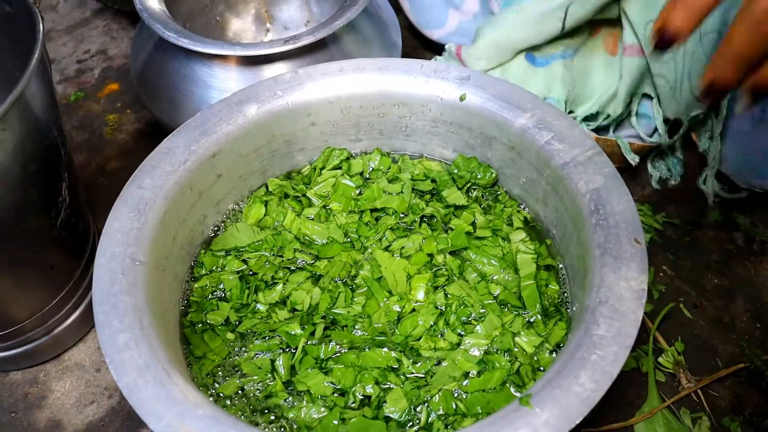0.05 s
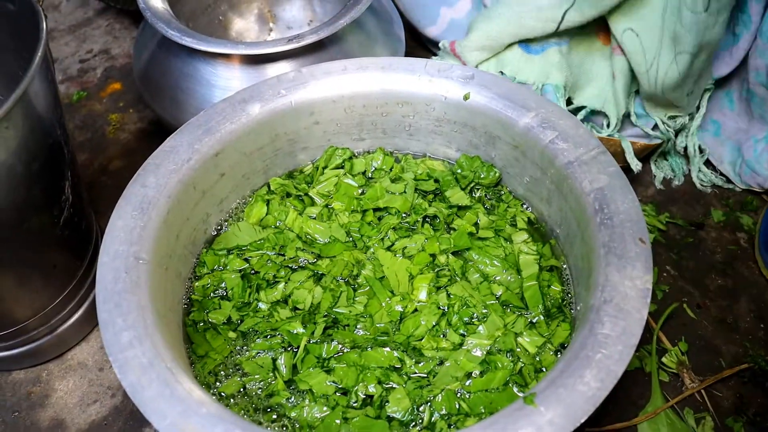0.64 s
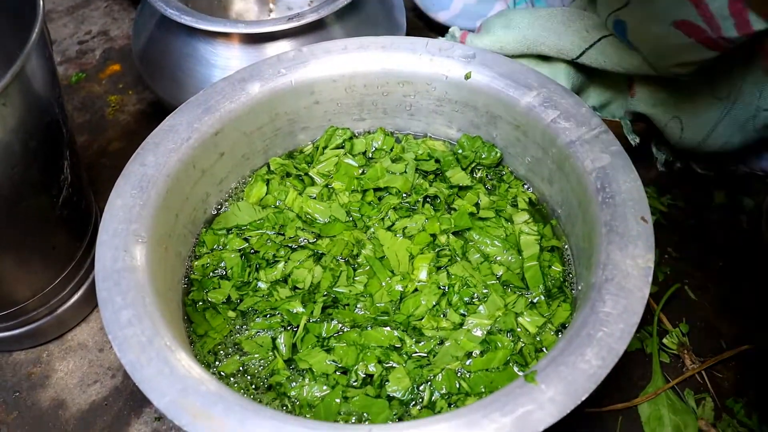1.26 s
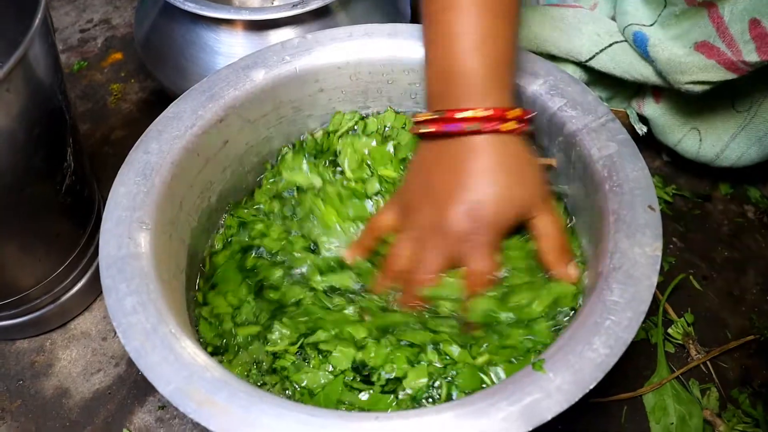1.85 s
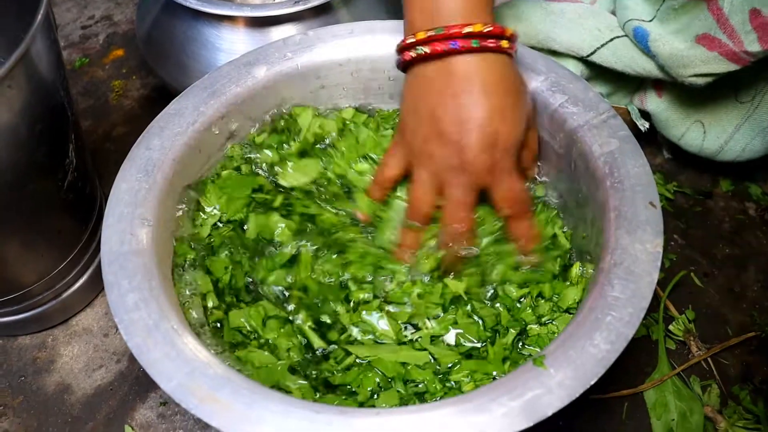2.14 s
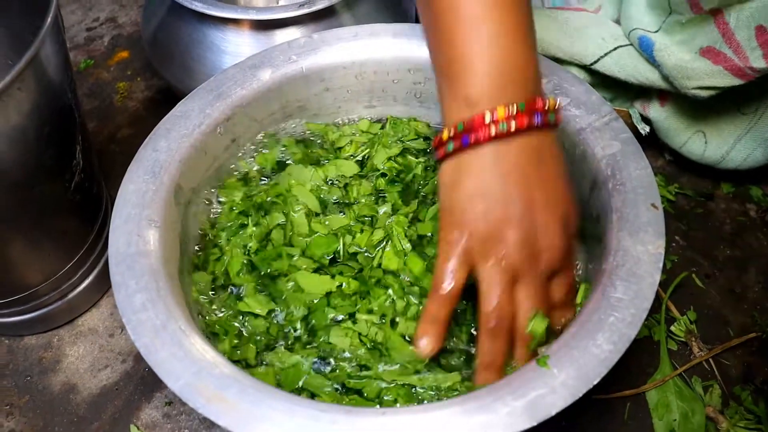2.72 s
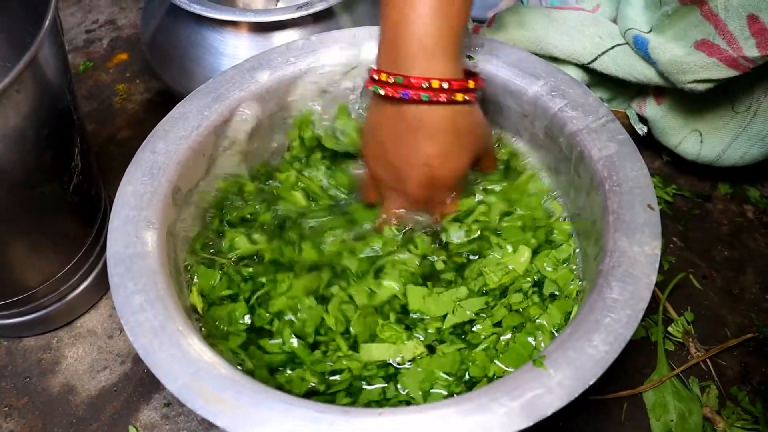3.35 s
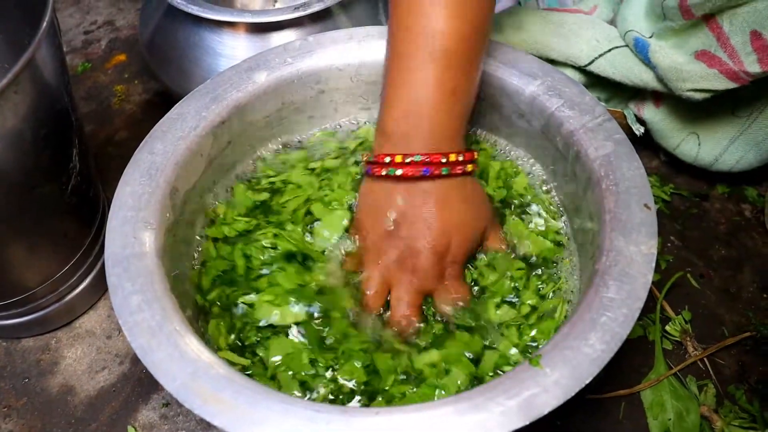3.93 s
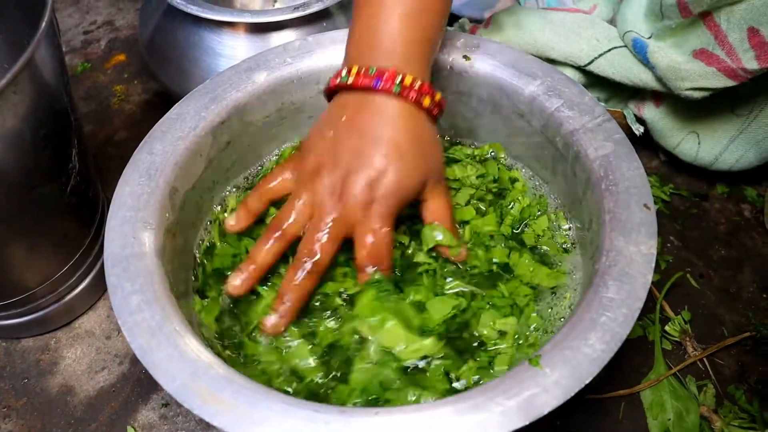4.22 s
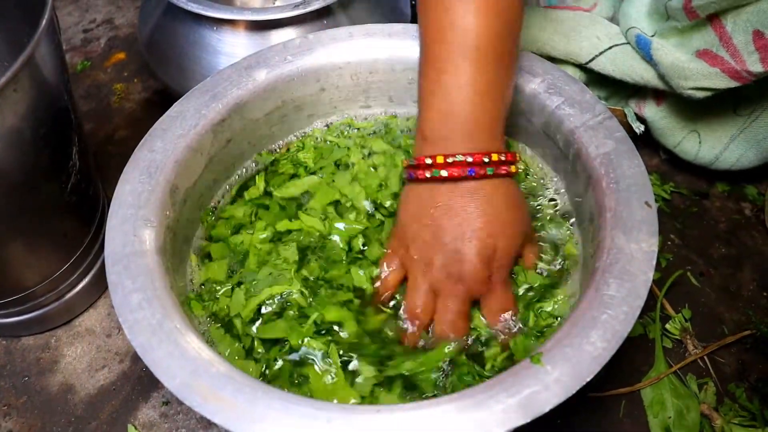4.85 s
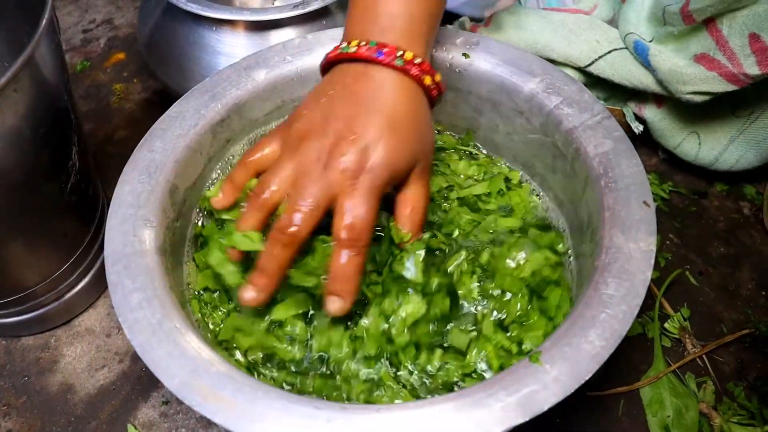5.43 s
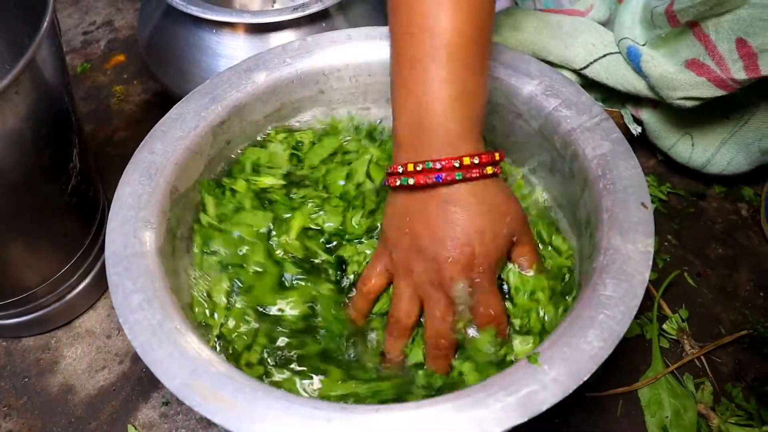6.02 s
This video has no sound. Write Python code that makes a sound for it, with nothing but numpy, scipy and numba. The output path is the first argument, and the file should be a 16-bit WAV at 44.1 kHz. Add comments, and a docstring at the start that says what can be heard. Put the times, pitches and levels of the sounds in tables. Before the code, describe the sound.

Bangles clink and cloth rustles, then water sloshes, splashes and bubbles as leaves are washed by hand in a basin.

```python
"""Chopped spinach washed by hand in a wide aluminium basin, outdoors in a yard, stereo microphone close by.
Over quiet air and a faint, far whistle, cloth rustles and bangles clink as the arm reaches over.
At about 1.7 s the hand dives in, then stirs about twice a second. Each stroke throws splashes,
folds air into ringing bubbles and crackles through the wet leaves; now and then the basin rings faintly."""
import sys
import numpy as np
from scipy import signal
from scipy.fft import rfft, irfft
from scipy.io import wavfile
from scipy.ndimage import uniform_filter1d
from numba import njit

SR = 44100
rng = np.random.default_rng(int(sys.argv[2]) if len(sys.argv) > 2 else 0)


def output_pcm(signal):
    """Save a mono or channel-first signal as 16-bit PCM at the path in sys.argv[1].

    Samples are clipped to [-1, 1] before scaling.
    """
    pcm = np.clip(np.atleast_2d(signal).T, -1, 1) * 32767
    wavfile.write(sys.argv[1], SR, np.round(pcm).astype(np.int16))


N = 272538
TIME = np.arange(N) / SR
FREQS = np.fft.rfftfreq(N, 1 / SR) + 1
HAND_IN_S, WETTING_S = 1.66, 0.018

# spectrum of spray landing on the leaves: (frequency [Hz], level [dB])
SPRAY_SPECTRUM = [(2500, -13.5), (4000, -6.5), (5200, 4.5), (7000, 5.5), (9000, 0), (11000, 2.5),
                  (13000, -1.5), (16000, -4)]
# spectrum of water slapping hand and leaves: (frequency [Hz], level [dB])
SLAP_SPECTRUM = [(250, -54), (450, -39), (650, -16), (1050, 12.5), (1350, -6), (2100, 8.5), (2500, 5.5),
                 (3200, 12), (4500, -4), (7000, -9)]


def from_db(db):
    """Decibels to gain."""
    return np.exp(np.asarray(db) * (np.log(10) / 20))


def rms_one(x):
    """Scale to rms 1."""
    return x / np.sqrt(np.mean(x ** 2) + 1e-20)


def at_hz(points, hz):
    """Read a spectrum on a log-frequency axis."""
    f, value = np.transpose(points)
    return np.interp(np.log(hz), np.log(f), value)


def filtered(x, kind, hz, order):
    """Butterworth filter."""
    return signal.sosfilt(signal.butter(order, hz, kind, fs=SR, output="sos"), x)


def add(out, s, sound):
    """Mix a sound in at time s."""
    i = max(int(s * SR), 0)
    part = sound[..., :max(N - i, 0)]
    out[..., i:i + part.shape[-1]] += part


def swell(start_s, hold_s, rise_db_per_s, fall_db_per_s):
    """Gain that rises to 1 at start_s, holds and falls away."""
    early, late = np.maximum(start_s - TIME, 0), np.maximum(TIME - start_s - hold_s, 0)
    return from_db(-np.minimum(rise_db_per_s * early + fall_db_per_s * late, 120))


def evened(x, span_s):
    """Hold the rms near 1 over a span, keeping the finer grain."""
    power = uniform_filter1d(np.mean(x ** 2, axis=0), max(int(span_s * SR), 8))
    return x / np.sqrt(np.abs(power) + .05 * power.mean())


def noise(spectrum, grain=1):
    """Coloured stereo noise of rms 1, centred in the bass and wide in the treble; grain makes it crackle."""
    # likeness of left and right at the microphone: (frequency [Hz], correlation [0..1])
    likeness = [(60, 0.98), (130, 1), (300, 0.88), (640, 0.81), (1400, 0.76), (3100, 0.54), (7000, 0.17),
                (15000, 0)]
    alike = np.clip(at_hz(likeness, FREQS), -1, 1)
    mid, side = rfft(rng.standard_normal((2, N)) * grain)
    pair = np.sqrt(1 + alike) * mid + np.sqrt(1 - alike) * side * [[1], [-1]]
    return rms_one(irfft(pair * from_db(at_hz(spectrum, FREQS)), N))


def impacts(per_s, spread_db):
    """Envelope of tiny impacts of unequal size, each dying in about a millisecond."""
    sizes = from_db(spread_db * np.minimum(rng.exponential(1, N), 4))
    hits = sizes * (rng.random(N) < per_s / SR)
    return signal.lfilter([1], [1, -np.exp(-1 / (0.00095 * SR))], hits + 1e-9)


def struck(modes, spread_db, detune):
    """Stereo ring of an object after one blow; strength and pitch of each mode vary with the contact."""
    hz, db, t60 = np.transpose(modes)[:, :, None]
    t = TIME[:SR // 5]
    strength = db + spread_db * rng.standard_normal(hz.shape)
    pitch = hz * (1 + detune * rng.standard_normal(hz.shape))
    phase = rng.standard_normal((2, len(hz), 1)) * np.minimum(hz / 4000, 2)
    return np.sum(from_db(strength - 60 * t / t60) * np.sin(2 * np.pi * pitch * t + phase), axis=1)


def yard_air():
    """The quiet outdoor air all around, mostly low rumble."""
    # spectrum of the air: (frequency [Hz], level [dB])
    air_spectrum = [(18, -14), (37, 6), (55, 3), (90, -3), (135, 6), (190, -2.5), (300, -3), (600, -7),
                    (1000, -13.5), (1800, -16), (3000, -29), (7000, -32), (16000, -18.5)]
    return from_db(-49.5) * noise(air_spectrum)


def reflections(x, t60, dull_hz):
    """Dense, quick echoes from the basin wall and the things standing around it."""
    t = TIME[:SR // 4]
    mid, side = rng.standard_normal((2, len(t))) * from_db(-60 * t / t60) * (t > .0012)
    side = filtered(side, "high", 1500, order=1)
    response = filtered(mid + side * [[1], [-1]], "low", dull_hz, order=1)
    return signal.fftconvolve(x, response / np.sqrt(2 * np.sum(mid ** 2)), axes=1)[:, :N]


def whistle():
    """Far off, a faint, airy tone flutters, climbs slowly and fades."""
    # course of the whistle: (time [s], pitch [Hz], level [dB])
    course = [(0, 1277, -62), (.23, 1357, -54), (.5, 1445, -63), (.59, 1470, -48), (.68, 1450, -75),
              (.8, 1440, -90)]
    s, hz, db = np.transpose(course)
    flutter = filtered(rng.standard_normal((2, N)), "low", 35, order=2)
    phase = 2 * np.pi * np.cumsum(np.interp(TIME, s, hz)) / SR
    tone = rms_one(flutter[0] * np.sin(phase) + flutter[1] * np.cos(phase))
    return from_db(np.interp(TIME, s, db)) * tone


def cloth():
    """A little to the right, fibres rub as sleeve and shawl sweep forward, until the hand is in."""
    # sweeps of the cloth: (time of peak [s], level [dB], rise [dB/s], fall [dB/s])
    sweeps = [(.23, -40, 94, 99), (1.1, -51.5, 13.5, 8)]
    # spectrum of rubbing fibres: (frequency [Hz], level [dB])
    rustle_spectrum = [(600, 1), (1400, 2), (2500, 4), (4000, 2), (7000, -2), (11000, -5), (16000, -12.5)]
    motion = sum(from_db(db) * swell(s, 0, rise, fall) for s, db, rise, fall in sweeps)
    reaching = np.clip((HAND_IN_S - TIME) / WETTING_S, 0, 1)
    fibres = impacts(per_s=9000, spread_db=2)
    return motion * reaching * noise(rustle_spectrum, fibres) * from_db([[-1.2], [1.2]])


def bangles():
    """Close on the right, two bangles meet with a crack and a slight knock, then shimmer out of tune."""
    # contacts: (time [s], level [dB], lowest strongly struck frequency [Hz])
    clinks = [(0.2202, -21, 1930), (0.445, -34, 2900), (0.569, -25, 1610), (0.582, -17.5, 4260),
              (0.7425, -24.5, 2920), (1.13, -32.5, 3600), (1.2178, -28, 4530), (1.302, -12.5, 7500),
              (1.318, -20, 6550), (1.3263, -12.5, 6900), (1.4924, -8, 3300), (1.545, -31, 2800)]
    # modes of a bangle: (frequency [Hz], level [dB], t60 [s])
    bangle_modes = [(3270, -2, 0.18), (3920, -7, 0.16), (4350, 2, 0.17), (5900, -13, 0.15),
                    (6540, -1, 0.16), (7050, 6, 0.079), (8000, -12, 0.2), (9930, -4, 0.18),
                    (13800, -13, 0.17), (14200, -6, 0.18)]
    out, t = np.zeros((2, N)), TIME[:SR // 5]
    fade = from_db(-60 * t / .016) + from_db(-25 - 60 * t / .16)
    for s, db, low_hz in clinks:
        crack = rng.standard_normal((2, len(t))) * fade
        ring = sum(struck(bangle_modes, spread_db=2.5, detune=.008) for _ in range(2))
        high_hz = min(2.8 * low_hz + 2500, 17000)
        clink = filtered(crack + from_db(-32.5) * ring, "band", [low_hz, high_hz], order=1)
        clink = filtered(clink, "high", 0.55 * low_hz, order=2)
        knock = filtered(crack[0], "low", 1500, order=1)
        add(out, s, from_db(db + 4) * (clink + from_db(-22) * knock))
    return out * from_db([[-1.8], [1.8]])


def basin_knocks():
    """Hand and water hit the basin wall; the water damps its ring."""
    # blows on the wall: (time [s], level [dB])
    blows = [(1.8892, -19.5), (1.907, -26.5), (2.114, -19.5), (2.136, -27.5), (2.363, -41), (5.186, -43)]
    # modes of the filled basin: (frequency [Hz], level [dB], t60 [s])
    basin_modes = [(402, -17, 0.27), (497, -13.5, 0.17), (555, -10, 0.2), (1020, -39, 0.094),
                   (1107, -25, 0.2), (2034, 5.5, 0.084), (2262, -13, 0.1), (2710, -22, 0.059),
                   (3000, -29, 0.059), (4460, -12, 0.072), (6200, -13, 0.16), (9900, -14, .1)]
    out = np.zeros((2, N))
    for s, db in blows:
        add(out, s, from_db(db) * struck(basin_modes, spread_db=2, detune=.004))
    return out


@njit
def ring_bubbles(rows, size, sr):
    """Each bubble swells within a cycle, rings down and climbs in pitch."""
    out = np.zeros((2, size))
    for k in range(len(rows)):
        s, gain, hz, t60, rise, stereo_phase = rows[k]
        start, decay = max(int(s * sr), 0), np.log(1000.) / t60
        for i in range(min(int(t60 * sr), size - start)):
            t = i / sr
            level = gain * (1 - np.exp(-(1.3 * hz * t) ** 2)) * np.exp(-decay * (t - 1.3 / hz))
            phase = 2 * np.pi * hz * (t + rise * t * (t / t60 / 2 - .2))
            out[0, start + i] += level * np.sin(phase + stereo_phase)
            out[1, start + i] += level * np.sin(phase - stereo_phase)
    return out


def bubbles(s, db, hz, t60, rise):
    """Bubbles at random places in the basin: the higher the pitch, the more left and right differ."""
    stereo_phase = rng.standard_normal(len(s)) * np.minimum(hz / 6000, 1)
    columns = np.broadcast_arrays(s, from_db(db), hz, np.maximum(t60, 4 / hz), rise, stereo_phase)
    return ring_bubbles(np.column_stack(columns), N, SR)


def pops(pockets, count, gap_s, unevenness, loss_db, scatter_octaves):
    """Each air pocket breaks in an uneven, dying run of pops, the pitch scattering after the first."""
    for s, db, hz in pockets:
        for k in range(count):
            delay_s = gap_s * k * (1 + unevenness * (rng.random() - .5))
            octaves = scatter_octaves * min(k, 1) * rng.standard_normal()
            yield s + delay_s, db - loss_db * k, hz * 2 ** octaves


def gulps():
    """Air breaks up under the palm; each pop rings hollow and shakes the water with a dull thud."""
    # air pockets: (time [s], level [dB], pitch [Hz])
    pockets = [(2.0277, -9.5, 577), (5.8341, -17, 593)]
    # spectrum of the thud: (frequency [Hz], level [dB])
    thud_spectrum = [(50, -30), (90, -8), (125, 9), (165, 2), (260, 5), (400, -3.5), (600, -20),
                     (1000, -46)]
    run = pops(pockets, count=6, gap_s=.009, unevenness=0.39, loss_db=4, scatter_octaves=0.26)
    s, db, hz = np.transpose(list(run))
    shaking, t = np.zeros(N), TIME[:SR // 4]
    for when, size_db in zip(s, db):
        add(shaking, when, np.minimum(t / 0.0021, 1) * from_db(size_db - 23 - 60 * t / 0.17))
    thud = shaking * evened(noise(thud_spectrum), span_s=0.015)
    return bubbles(s, db, hz, t60=0.026, rise=0.053) + filtered(thud + 1e-18, "high", 90, order=4)


def plops(ring_cycles=26.6, snap_db=-14, snap_t60_s=0.018):
    """Single loud bubbles, each born with the small snap of the closing water; small ones die sooner."""
    # the loudest bubbles: (time [s], level [dB], pitch [Hz])
    loud_bubbles = [(1.7805, -12, 3560), (1.8444, -5.5, 2920), (1.9075, -12, 2300), (1.9948, -16, 2130),
                    (2.119, -6, 1076), (2.2308, -7, 3120), (2.2409, -12, 1530), (2.2825, -19, 660),
                    (2.366, -17, 590), (2.4659, -20.5, 700), (2.4872, -16, 2020), (2.5533, -16, 2480),
                    (2.8534, -16, 1520), (2.9272, -16.5, 847), (2.939, -12.5, 4260), (3.1903, -16, 3040),
                    (3.228, -16, 1490), (3.3013, -19, 3000), (3.3444, -15, 1460), (3.403, -15, 1037),
                    (3.4151, -13, 1190), (3.517, -21, 973), (3.6966, -9, 3480), (3.709, -11, 2580),
                    (3.7309, -20, 1950), (3.7533, -9.5, 3110), (3.9462, -10.5, 2820), (3.97, -23, 630),
                    (3.985, -10, 2770), (4.016, -18.5, 2020), (4.2235, -21.5, 2060), (4.399, -30, 740),
                    (4.456, -18, 2900), (4.7504, -8.5, 4450), (4.7984, -14, 3050), (4.814, -14, 3340),
                    (5.069, -23, 2470), (5.097, -12, 3300), (5.1782, -9, 1970), (5.1858, -7.5, 3310),
                    (5.204, -10.5, 1930), (5.224, -16, 970), (5.267, -16.5, 1193), (5.481, -23.5, 1083),
                    (5.6, -16, 2110), (5.615, -22, 768), (5.64, -14, 1010), (5.658, -7, 3090),
                    (5.7029, -14, 3400), (5.7406, -18, 2750), (5.9995, -7.5, 3890), (6.03, -18, 1010),
                    (6.048, 0, 3140), (6.075, -21.5, 1100)]
    s, db, hz = np.transpose(loud_bubbles)
    snap = np.zeros(N)
    for when, size_db in zip(s, db):
        add(snap, when, from_db(size_db + snap_db - 60 * TIME[:SR // 20] / snap_t60_s))
    ringing = bubbles(s, db + .5, hz, t60=ring_cycles / hz, rise=0.11 * rng.random(len(s)))
    return ringing + snap * noise(SLAP_SPECTRUM)


def splashes(mist_above_hz=11300):
    """Water slaps hand and leaves: dense bursts of droplets that hold briefly and die fast."""
    # slaps: (time [s], length [s], body [dB], spray [dB], finest mist relative to spray [dB])
    slaps = [(1.742, .0094, -47, -28, 5), (1.775, 0.0026, -53, -42, -3), (1.889, 0.0035, -13.5, -15, 5),
             (2.1163, 0.0019, -20, -21, 11), (2.138, 0.0085, -46, -25.5, 14),
             (2.364, 0.0048, -19.5, -22, -6), (2.446, 0.0016, -24.5, -16.5, 7.5),
             (2.499, 0.00086, -48, -31, 0), (2.509, 0.008, -56, -30, 13.5), (2.666, 0.00033, -22, -29, -7),
             (2.721, 0.012, -32.5, -29, 5), (3.145, 0.0036, -39, -28.5, -5), (3.226, 0.0055, -41, -28, -7),
             (3.425, 0.0029, -39, -25.5, -1), (3.52, 0.004, -22, -18.5, -7),
             (3.881, 0.027, -22, -21.5, 8.5), (3.934, 0.023, -47, -28, 8), (3.965, .0023, -46, -20.5, 5),
             (4.285, 0.019, -39, -25, -2), (4.306, 0.013, -24, -15, 4.5), (4.349, 0.0039, -30, -23.5, 5),
             (4.395, .0086, -27, -23, -9), (4.598, 0.0021, -31, -33.5, 4), (4.747, 0.003, -33, -26, -3),
             (5.093, .003, -45, -38, -4), (5.176, 0.0038, -25, -19.5, 4), (5.187, 0.0096, -25.5, -37, 0),
             (5.245, 0.0048, -23, -21, -7), (5.267, 0.0055, -26, -20, -3), (5.483, .003, -31.5, -52, 0),
             (5.511, 0.0023, -47, -28, -3), (5.538, 0.0082, -45, -20.5, 0), (5.551, 0.0097, -21, -10, -7),
             (6.058, 0.0019, -41, -21, 7)]
    gains, t = np.zeros((3, N)), TIME[:SR // 10]
    for s, length, body_db, spray_db, mist_db in slaps:
        attack = np.minimum(t / (.12 * length), 1)
        decay = from_db(-60 * np.maximum(t - .6 * length, 0) / (.003 + 1.6 * length))
        add(gains, s, from_db([[body_db + 5], [spray_db + .5], [spray_db + mist_db + .5]]) * attack * decay)
    body_gain, spray_gain, mist_gain = gains
    grain = impacts(per_s=6000, spread_db=2.5)
    drops = evened(noise(SPRAY_SPECTRUM, grain), span_s=0.0072)
    mist = irfft(rfft(drops) / (1 + (mist_above_hz / FREQS) ** 10), N)
    spray = (spray_gain * (drops - mist) + mist_gain * mist) * from_db([[-.8], [.8]])
    body = body_gain * evened(noise(SLAP_SPECTRUM, grain), span_s=0.0029)
    return filtered(body + spray + 1e-18, "high", 380, order=2)


def froth(low_hz, high_hz, count, cycles, spread_db, rise):
    """A crowd of bubbles of random size and pitch, a few far louder than the rest; rms about 1."""
    when, pitch, size, life, lift = rng.random((count, 5)).T
    s = HAND_IN_S + when * (N / SR - HAND_IN_S)
    hz = low_hz * (high_hz / low_hz) ** pitch
    db = -spread_db * np.log(size + .01)
    return evened(bubbles(s, db, hz, t60=cycles * (.5 + life) / hz, rise=rise * lift), span_s=0.083)


def churn():
    """Each push swells, holds and ebbs, then water trickles back through the leaves; gives three gains."""
    # pushes of the hand: (time [s], length [s], large bubbles [dB], small bubbles [dB], spray [dB])
    strokes = [(1.713, 0.14, -58, -34, -40.5), (1.815, 0.24, -37.5, -31, -43.5),
               (2.109, 0.023, -28, -24.5, -33), (2.221, 0.032, -44, -24.5, -32.5),
               (2.263, 0.16, -32, -29, -39), (2.452, 0.25, -45, -35, -42), (2.824, 0.25, -42.5, -31, -45.5),
               (3.802, 0.0091, -58, -44, -39), (3.225, 0.11, -35, -26, -39), (3.38, 0.057, -35, -25.5, -43),
               (3.514, 0.0081, -36, -26, -46), (3.706, 0.032, -37.5, -23.5, -34),
               (3.878, 0.036, -35, -33.5, -28), (3.983, 0.016, -31, -32, -45),
               (4.294, 0.06, -36.5, -31, -37), (4.445, 0.017, -71, -37, -39), (4.717, 0.1, -61, -33.5, -39),
               (5.106, 0.012, -69, -34, -44.5), (5.191, 0.0067, -33.5, -24.5, -31.5),
               (5.268, 0.008, -33.5, -28.5, -32.5), (5.556, 0.0066, -51, -26.5, -33),
               (5.62, 0.11, -41, -30.5, -43.5), (5.959, 0.016, -44.5, -24, -29),
               (6.036, 0.042, -38.5, -30, -48)]
    restless_gain = from_db([[-59], [-48], [-54.5]])  # the water between pushes: large, small, spray
    trickle_gain = from_db([[-13], [-6], [-12.5]])  # relative to the push
    power = restless_gain ** 2
    for s, length, *levels_db in strokes:
        push = swell(s, length, rise_db_per_s=370, fall_db_per_s=408)
        trickle = trickle_gain * swell(s, length, rise_db_per_s=370, fall_db_per_s=105)
        power = power + (from_db(levels_db)[:, None] * np.maximum(push, trickle)) ** 2
    return np.sqrt(power) * np.clip((TIME - HAND_IN_S) / WETTING_S, 0, 1)


def stirring():
    """The hand churns up bubbles of three sizes; water laps through the leaves and spray patters on them."""
    large_gain, small_gain, spray_gain = churn()
    large = froth(low_hz=540, high_hz=1550, count=1100, cycles=24, spread_db=5.3, rise=.35)
    small = froth(low_hz=1473, high_hz=4100, count=2000, cycles=32, spread_db=7.5, rise=0.39)
    pings = froth(low_hz=3970, high_hz=15400, count=7000, cycles=64, spread_db=6, rise=0.3)
    lapping = evened(noise(SLAP_SPECTRUM, impacts(per_s=600, spread_db=4.5)), span_s=.04)
    patter = evened(noise(SPRAY_SPECTRUM, impacts(per_s=500, spread_db=6)), span_s=.1)
    return (large_gain * from_db(-2) * large
            + small_gain * (from_db(-4) * small + from_db(-6) * lapping)
            + spray_gain * (from_db(2.04) * pings + from_db(-2.5) * patter) * from_db([[-.6], [.6]]))


def scene():
    """Water, basin and bangles close to the microphone, over the quiet air of the yard."""
    near = stirring() + plops() + splashes() + gulps() + basin_knocks() + bangles()
    wall_echoes = from_db(-13) * reflections(near, t60=.4, dull_hz=4000)
    close_echoes = from_db(-4) * reflections(near, t60=0.062, dull_hz=6740)
    return near + close_echoes + wall_echoes + cloth() + whistle() + yard_air()


def record(dry):
    """The microphone's right port hears more treble; deepest rumble and top are cut, and peaks clip."""
    # left minus right: (frequency [Hz], level [dB])
    balance = [(200, -.5), (700, 1.5), (1300, 1), (2300, -5), (4400, -0.5), (8000, 0.5), (15000, -10.5)]
    lean = from_db(at_hz(balance, FREQS) / 2 * np.array([[1], [-1]]))
    heard = irfft(rfft(dry) * lean / np.sqrt(np.mean(lean ** 2, axis=0)), N)
    heard = filtered(heard, "high", 29, order=4)
    top_cut = signal.ellip(10, .1, 70, 16000, fs=SR, output="sos")
    return signal.sosfilt(top_cut, np.clip(heard, -1, 1))


dry = scene()
out = record(dry)
output_pcm(out)
```